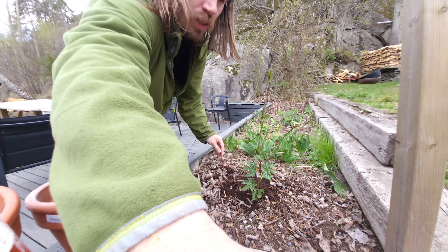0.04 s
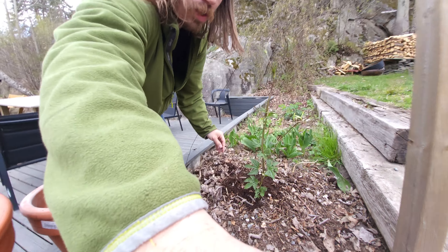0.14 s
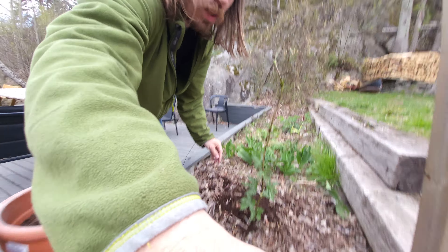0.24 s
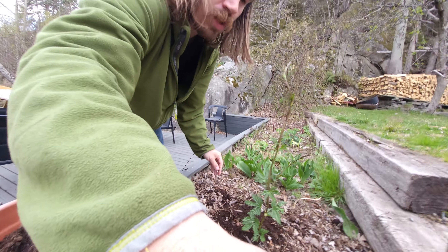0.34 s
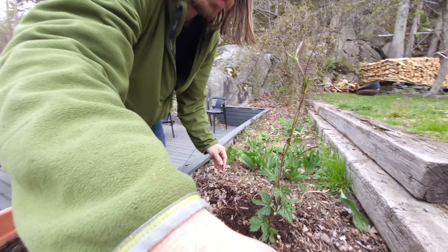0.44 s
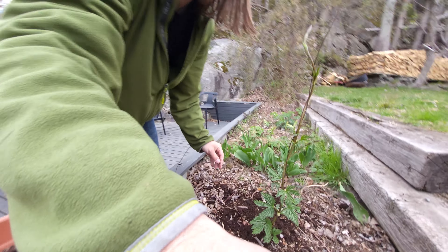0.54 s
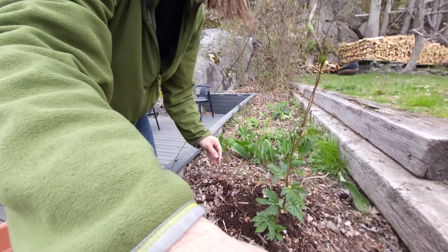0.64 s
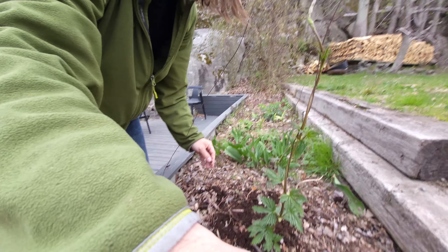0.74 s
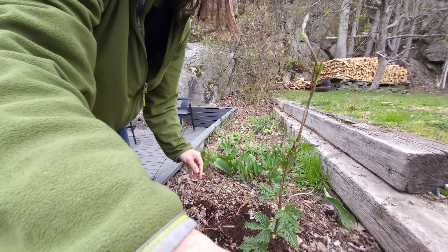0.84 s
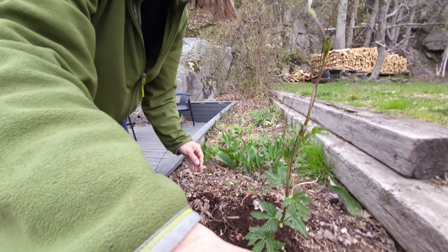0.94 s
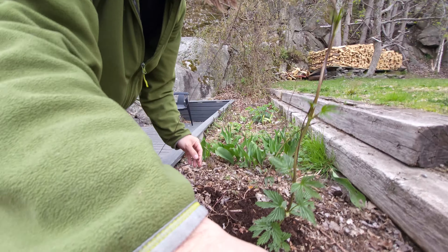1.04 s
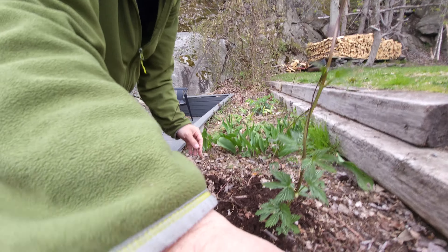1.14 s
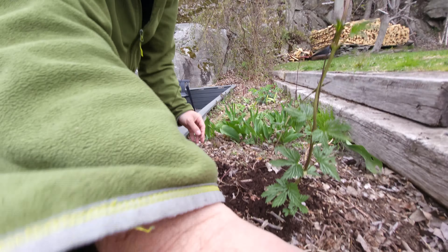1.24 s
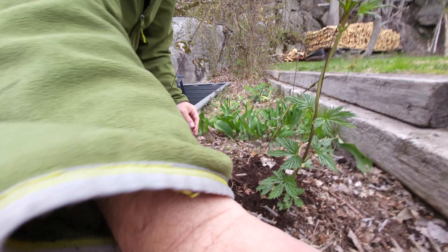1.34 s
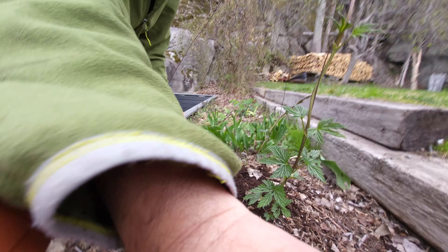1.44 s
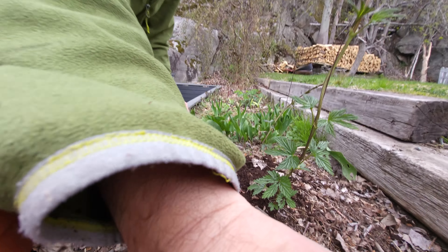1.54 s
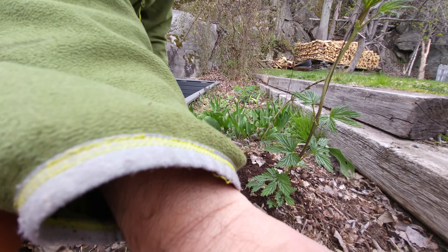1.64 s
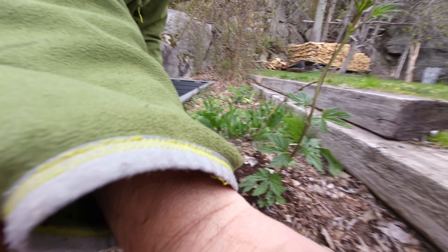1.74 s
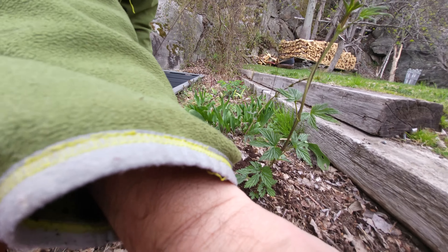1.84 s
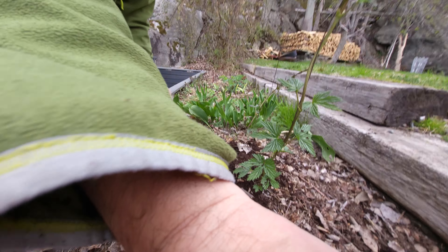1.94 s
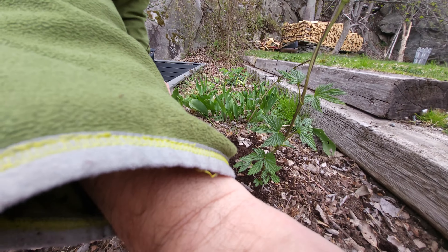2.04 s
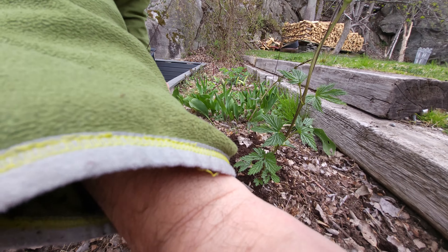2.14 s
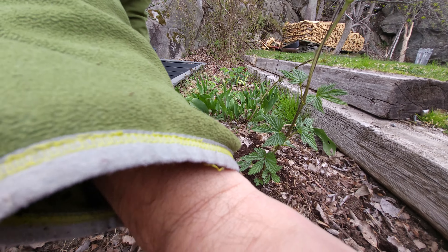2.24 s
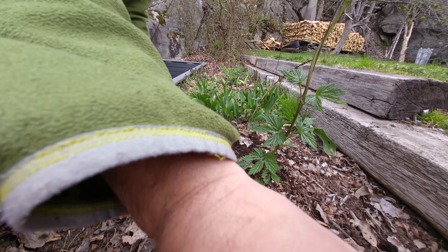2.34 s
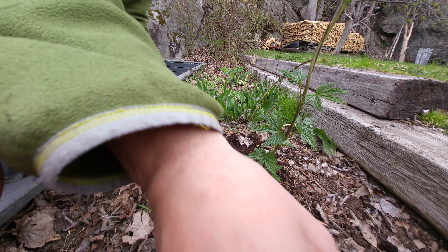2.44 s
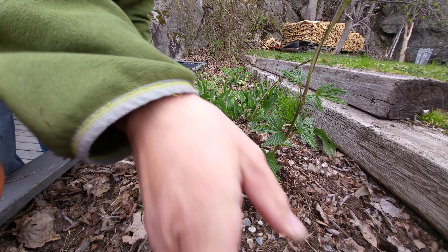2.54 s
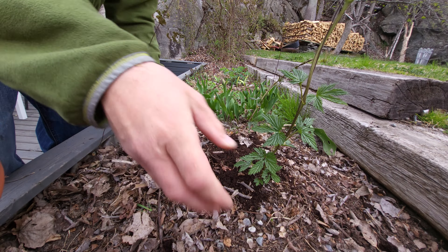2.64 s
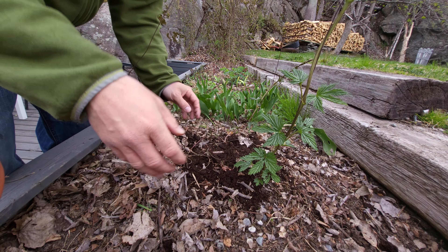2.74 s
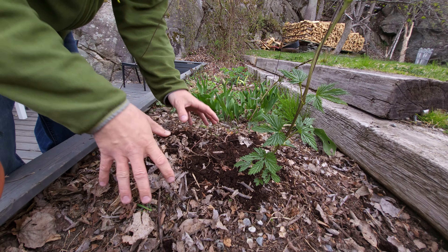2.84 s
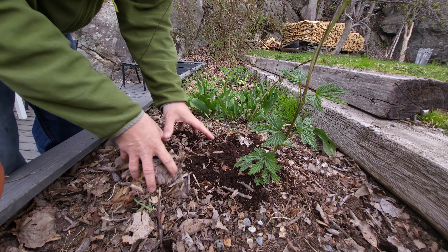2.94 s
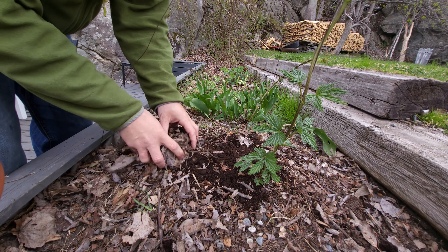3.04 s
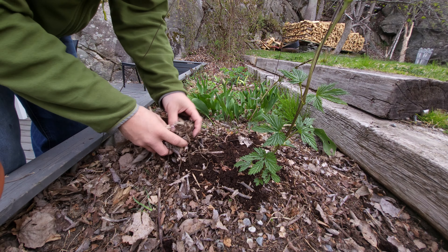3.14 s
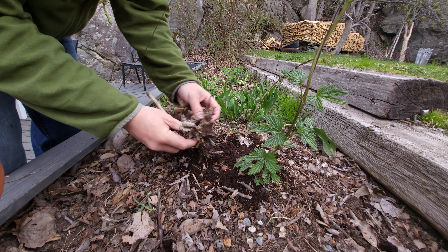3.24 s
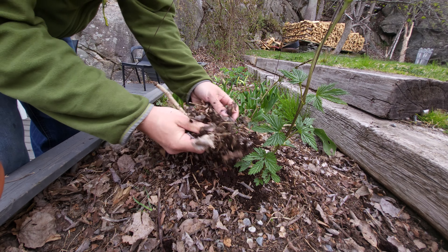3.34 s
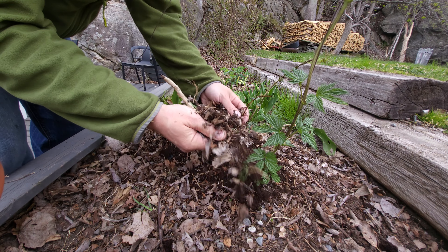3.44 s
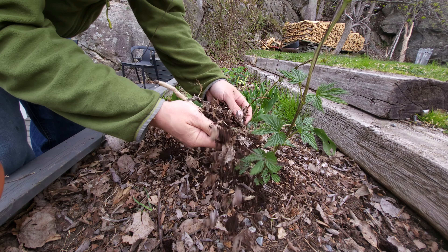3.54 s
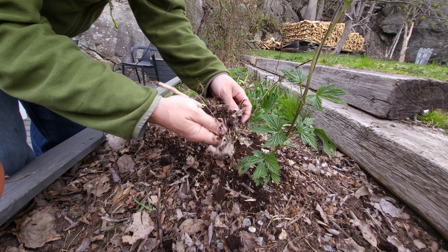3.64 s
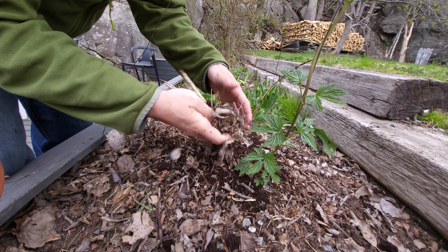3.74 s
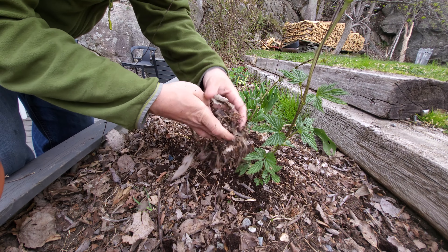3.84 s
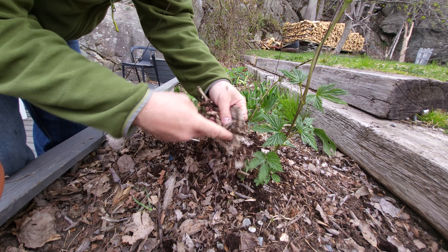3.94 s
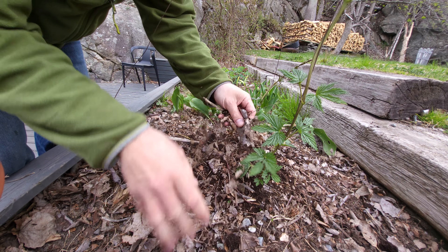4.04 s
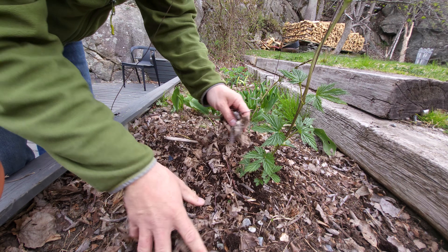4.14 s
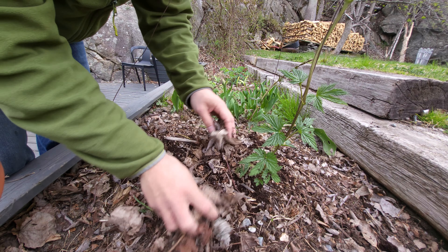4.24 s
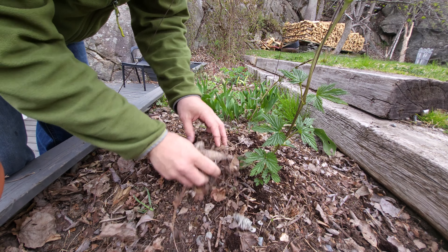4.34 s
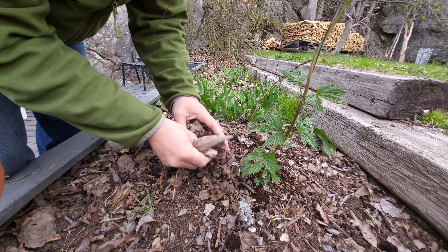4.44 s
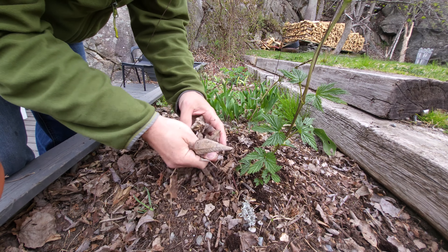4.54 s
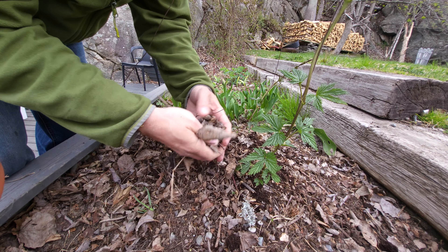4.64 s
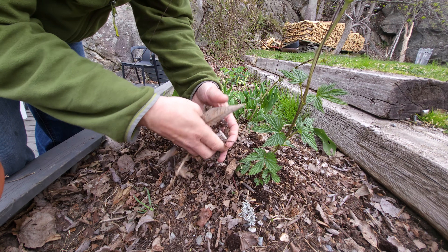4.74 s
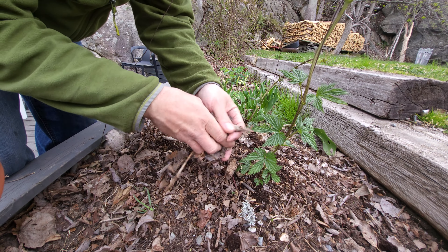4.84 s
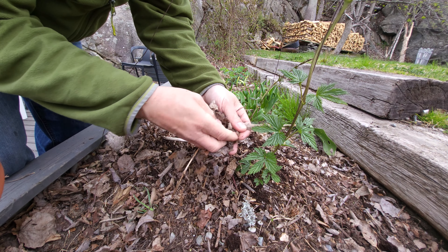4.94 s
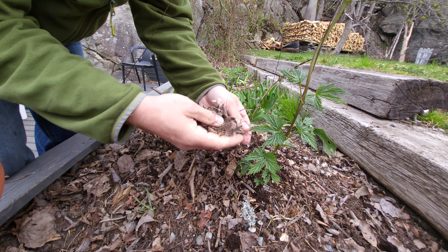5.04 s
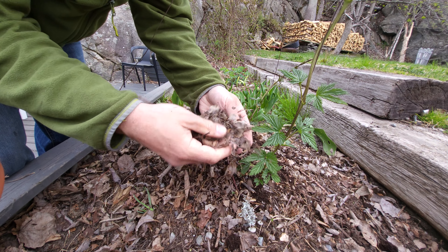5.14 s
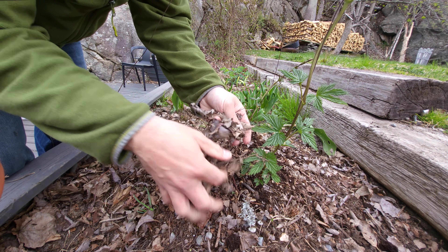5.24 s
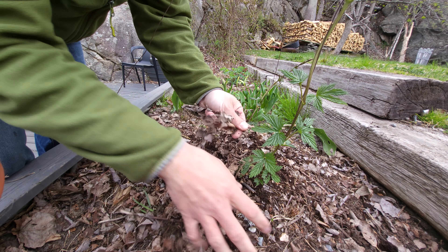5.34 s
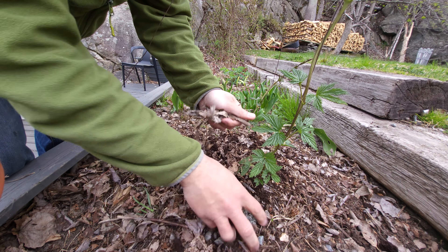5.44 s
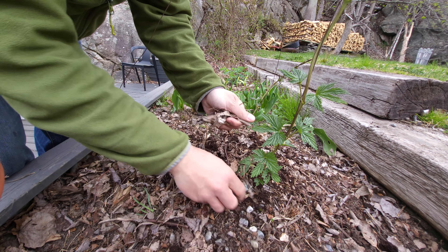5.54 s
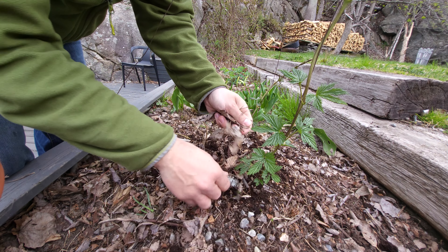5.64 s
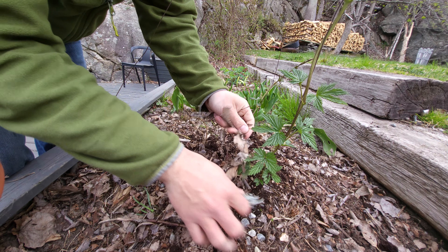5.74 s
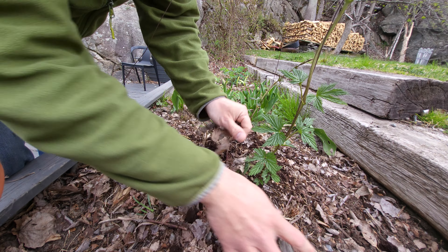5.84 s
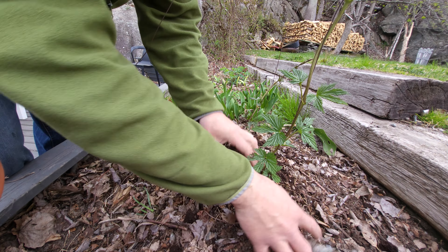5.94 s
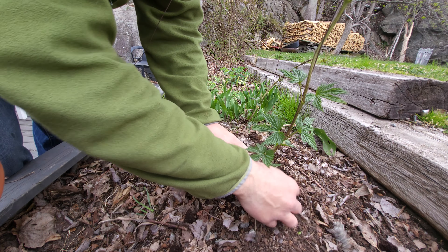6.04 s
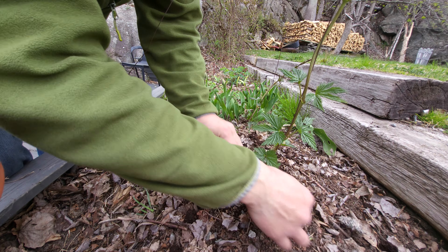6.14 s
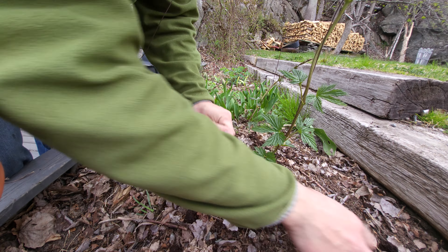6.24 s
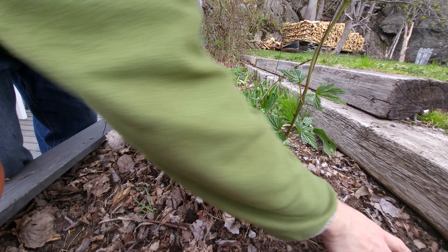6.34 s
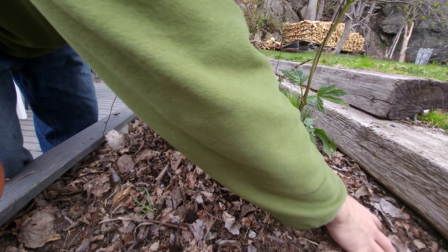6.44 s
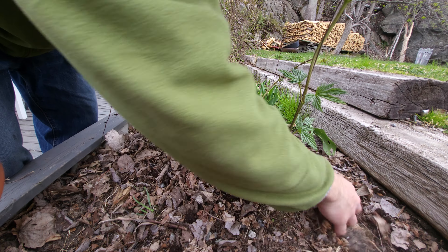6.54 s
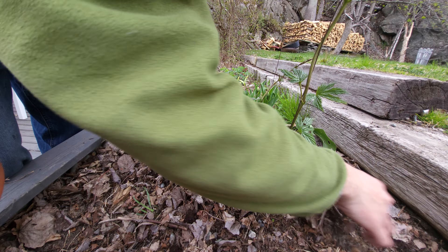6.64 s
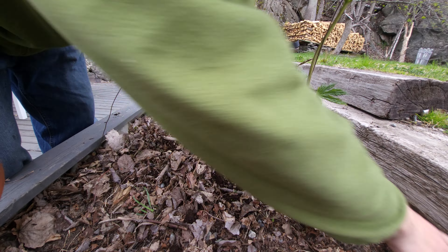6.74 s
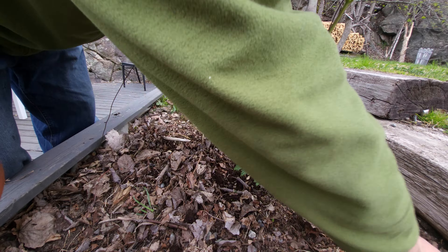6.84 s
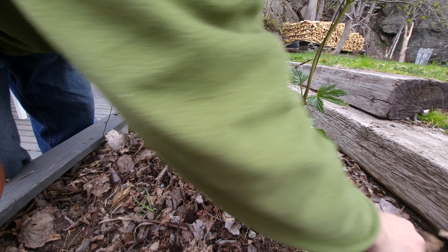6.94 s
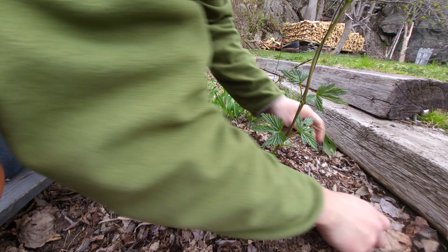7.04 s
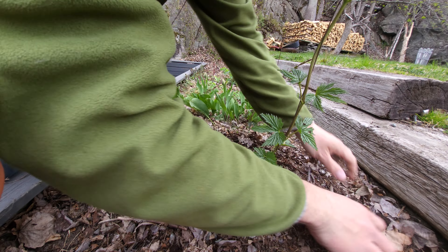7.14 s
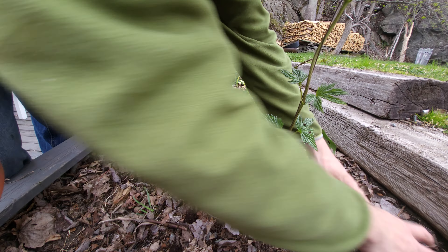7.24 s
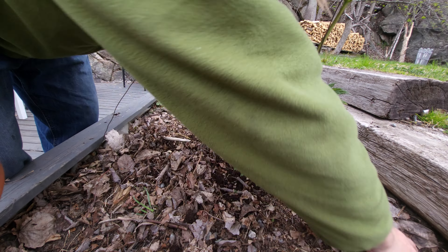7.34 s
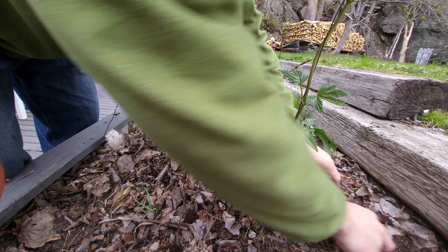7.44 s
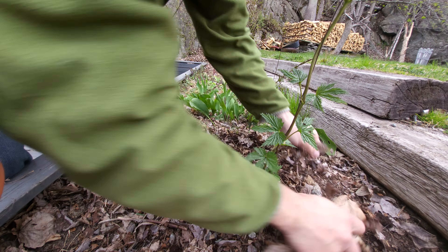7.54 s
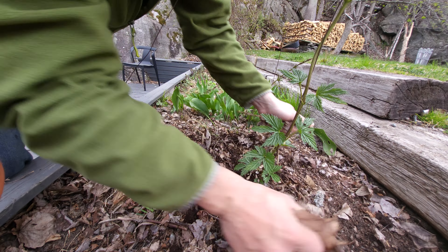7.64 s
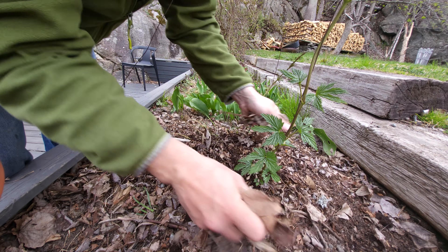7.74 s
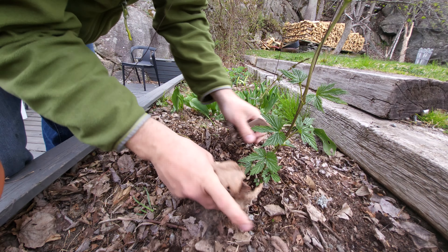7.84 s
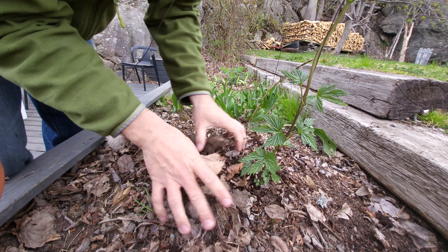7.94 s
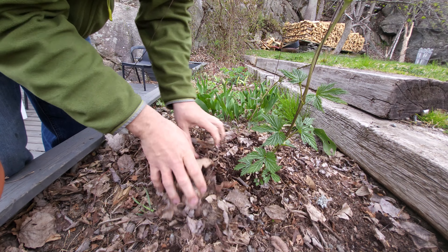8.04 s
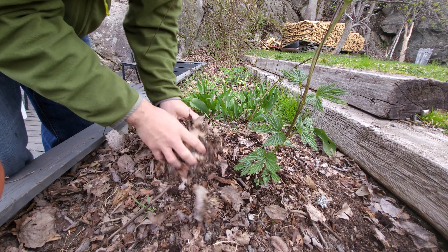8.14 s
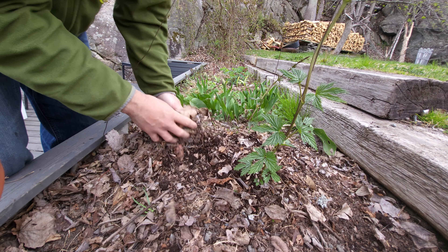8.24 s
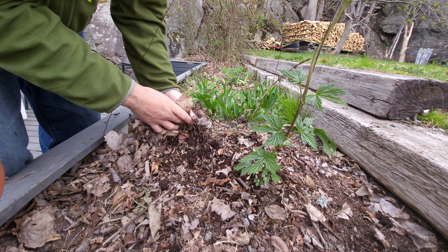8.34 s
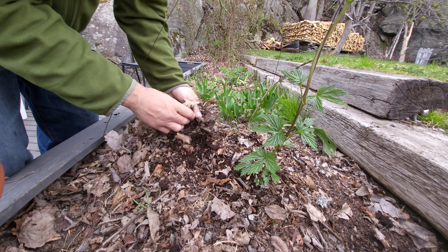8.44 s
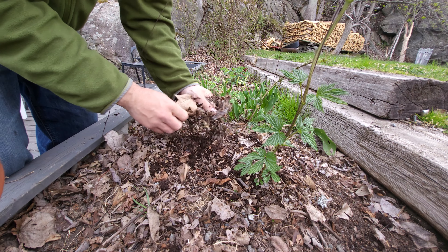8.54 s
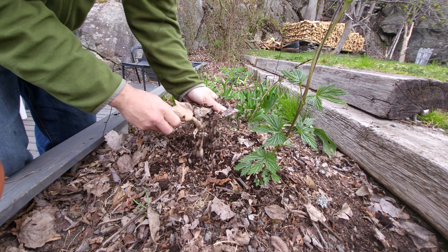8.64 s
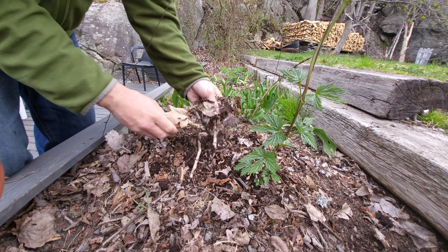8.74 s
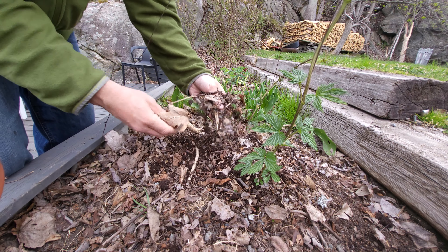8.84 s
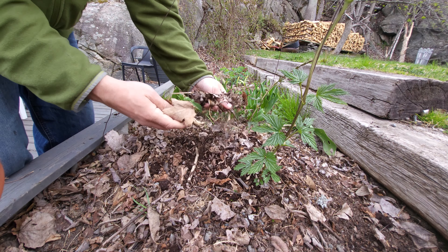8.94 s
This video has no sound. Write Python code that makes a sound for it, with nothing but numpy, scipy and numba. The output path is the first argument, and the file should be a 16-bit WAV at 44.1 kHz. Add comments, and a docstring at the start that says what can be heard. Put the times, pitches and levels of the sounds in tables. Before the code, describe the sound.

Close handling thumps and a squeaky rub, a short near-silence, then crisp dry leaves crunched, snapped and swept by hand on soil outdoors.

```python
"""Fingers rub and knock on a phone's case and a fleece sleeve slides past; then dry leaves crackle under two hands.
A gardener has set the phone beside a bed and gathers, crushes and sweeps the leaves half a metre away.
Each crack is a small avalanche of damped oscillations; countless tiny ones make the rustle over scraping soil.
Skin and sleeve are coloured noise, each knock excites the modes of the case, and the garden air is faint noise."""
import sys
import numpy as np
from scipy import signal
from scipy.fft import rfft, irfft, next_fast_len
from scipy.io import wavfile
from scipy.ndimage import uniform_filter1d, map_coordinates
from numba import njit

SR = 44100
rng = np.random.default_rng(int(sys.argv[2]) if len(sys.argv) > 2 else 0)


def pcm_store(signal):
    """Save signal as 16-bit PCM."""
    levels = np.round(np.clip(np.atleast_2d(signal), -1, 1) * 32767)
    wavfile.write(sys.argv[1], SR, levels.astype(np.int16).T)


N = 396018
TOP_HZ = 16000  # highest pitch of a fracture, and the edge of the phone's pass band


def undb(db):
    """Amplitude gain is 10 to the power of a twentieth of the level in decibels."""
    return 10 ** (np.asarray(db) / 20)


def unit(x):
    """Normalisation to an rms amplitude of 1."""
    return x / np.sqrt(np.mean(x ** 2))


def curves(table):
    """Linear interpolation of each column of a table against its first, at every sample."""
    s, *columns = np.transpose(table)
    return [np.interp(np.arange(N) / SR, s, column) for column in columns]


def sides(pan_db):
    """Interaural-style level difference: left and right gains, left minus right in dB, with mean power 1."""
    gains = undb(np.array([pan_db, -pan_db]) / 2).reshape(2, -1)
    return gains / np.sqrt(np.mean(gains ** 2, axis=0))


def colour(x, points):
    """Minimum-phase filtering: a causal cepstrum gives the filter its (hz, level_db) outline."""
    hz, db = np.transpose(points)
    size = next_fast_len(x.shape[-1] // 2 + 2048) * 2
    f = np.maximum(np.arange(size // 2 + 1) * SR / size, 1)
    outline_db = np.interp(np.log(f), np.log(hz), db)
    cepstrum = irfft(np.log(undb(outline_db)))
    # fold negative times onto positive ones
    cepstrum[1:size // 2] *= 2
    cepstrum[size // 2 + 1:] = 0
    response = np.exp(rfft(cepstrum))
    return irfft(rfft(x, size) * response)[..., :x.shape[-1]]


def resonate(x, hz, width_hz):
    """Simple resonance: a second-order band-pass with gain 1 at its centre."""
    return signal.lfilter(*signal.iirpeak(hz, hz / width_hz, fs=SR), x)


def add(out, s, sound):
    """Superposition of a short stereo sound at time s."""
    i = max(int(s * SR), 0)
    out[:, i:i + sound.shape[1]] += sound[:, :N - i]


def walk(rate):
    """Slow random modulation: levels drawn every 1 / rate s and joined by slopes, with a spread near 1."""
    k = int(SR / rate)
    steps = np.repeat(rng.standard_normal(N // k + 1), k)
    return 1.2 * uniform_filter1d(steps, k)[:N]


def gestures(rows, sag_db_per_s, release_db_per_s):
    """Power sum of movements (start_s, length_s, attack_s, level_db): build-up, steady dB slope and release."""
    power = np.zeros(N)
    for start, length, attack, db in rows:
        first = max(int(start * SR), 0)
        t = np.arange(min(N - first, int((length + .5) * SR))) / SR
        build = np.minimum(t / attack, 1) ** 2
        fall_db = sag_db_per_s * t + release_db_per_s * np.maximum(t - length, 0)
        power[first:first + len(t)] += (build * undb(db - fall_db)) ** 2
    return np.sqrt(power)


def flex(x, depth_db, count, size):
    """Time-varying colour of bending surfaces: count spectral zones wander, with new levels every size frames."""
    _, _, spectrum = signal.stft(x, nperseg=256)
    bins, frames = spectrum.shape[1:]
    zones = rng.standard_normal((count + 1, frames // size + 2))
    zone_at_bin = np.sqrt(np.arange(bins) / bins) * count
    where = np.meshgrid(zone_at_bin, np.arange(frames) / size, indexing="ij")
    gain = undb(depth_db * map_coordinates(zones, where, order=1))
    return signal.istft(spectrum * gain)[1][:, :N]


def even_out(x, window_s):
    """Power normalisation: single cracks stand out, but the mean power over a short window stays near 1."""
    power = uniform_filter1d(np.mean(x ** 2, axis=0), int(window_s * SR))
    return x / np.sqrt(power + 1e-6)


@njit
def grains(start, pole, size):
    """Sum of damped oscillations: each complex pole sets pitch and decay, with starts between samples."""
    out = np.zeros(N)
    for k in range(len(start)):
        first = int(start[k]) + 1
        z = size[k] * np.exp(pole[k] * (first - start[k]))
        step = np.exp(pole[k])
        for i in range(max(first, 0), min(first + int(-5 / pole[k].real), N)):
            out[i] += z.real
            z *= step
    return out


def crackle(rate, spread_db, run_ms, ring_ms, lag_ms, scatter_ms, other_share, count, lo_hz=0, hi_hz=TOP_HZ):
    """Avalanche statistics: random cracks, each a run of count fractures with their own pitch and decay."""
    cracks = int(rate * N / SR)
    when, hand = rng.random((cracks, 2)).T
    strength, place = rng.standard_normal((cracks, 2)).T
    when = when * (N - 1)
    build, wait, pitch, ring, turn = np.moveaxis(1 - rng.random((cracks, count, 5)), 2, 0)
    # two waits in a row: the run of fractures first swells, then thins out
    start = when[:, None] - np.log(build * wait) * run_ms * SR / 1000
    life = ring_ms * SR / 1000 * 2 ** (2 * ring - 1)
    hz = lo_hz + pitch * (hi_hz - lo_hz)
    pole = -1 / life + 2j * np.pi * hz / SR
    crack_gain = undb(spread_db * np.minimum(strength, 1.9))[:, None]
    # a shorter ring starts higher
    size = crack_gain * np.exp(2j * np.pi * turn) / np.sqrt(life)
    # a crack lies beside the working hand or the other one, straight ahead, and reaches each port at its own time
    hand_lag = np.where(hand < other_share, 0, lag_ms[when.astype(int)])
    lag = (hand_lag + scatter_ms * place)[:, None] * SR / 1000
    ports = [grains((start + side * lag / 2).ravel(), pole.ravel(), size.ravel()) for side in (1, -1)]
    return unit(np.array(ports))


def reflections(x, decay_ms, wet_db):
    """Diffuse scattering in the leaf litter: a noise wash, different at each port, follows the decaying energy."""
    keep = np.exp(-1000 / (decay_ms * SR))
    energy = signal.lfilter([1 - keep], [1, -keep], x ** 2)
    return x + undb(wet_db) * np.sqrt(energy) * rng.standard_normal(x.shape)


def snaps(table, lag_ms, rise_s, t60_s, ring_q, ring_db, own_share):
    """Impulsive excitation of a resonance: a noise burst rises, decays and rings at the pitch of the piece."""
    out, t = np.zeros((2, N)), np.arange(SR // 20) / SR
    shape = (1 - np.exp(-t / rise_s)) * undb(-60 * t / t60_s)
    for s, db, hz in table:
        noise = rng.standard_normal((3, len(t)))
        # one noise common to both ports, and a share of each port's own
        burst = (noise[2] + own_share * noise[:2]) * shape
        burst = burst + undb(ring_db) * resonate(burst, hz, hz / ring_q)
        # the farther port hears it later
        lag = int(lag_ms[int(s * SR)] * SR / 1000)
        burst = np.array([np.roll(burst[0], max(lag, 0)), np.roll(burst[1], max(-lag, 0))])
        burst = colour(burst, [(150, -14.5), (900, -1.5), (2500, 6), (15000, 8.0), (18000, -31)])
        peak = np.abs(burst).max(axis=1, keepdims=True)
        add(out, s + 0.00046, burst / peak * undb(db))
    return out


def background():
    """Stationary filtered noise is the faint garden air; enveloped low noise is the work shaking the phone."""
    # spectrum of the garden air: hz, density_db [relative dB per Hz]
    air_spectrum = [(15, -32.5), (25, -22.5), (102, -9), (451, -13), (531, -19.5), (607, -24), (13600, -30),
                    (16000, -45.5)]
    # the work shakes the phone's support: start_s, length_s, attack_s, rumble_db
    shake_rows = [(0.0, 0.11, 0.014, -41), (0.35, 0.61, 0.22, -56), (0.98, 1.47, 0.045, -66.5),
                  (1.53, .07, .02, -56.5), (2.5, 2.05, .1, -76), (4.92, 0.32, 0.033, -58.5),
                  (5.33, 0.56, 0.039, -61), (5.79, 0.087, .03, -54.5), (6.45, 1.3, .04, -67),
                  (6.85, 0.047, .02, -59), (8.8, 0.094, 0.029, -49)]
    air = unit(colour(rng.standard_normal((2, N)), air_spectrum)) * undb(-75.5)
    rumble = colour(rng.standard_normal((2, N)), [(22, -25.5), (50, 6), (100, 2.5), (150, -12.0), (2000, -64.0)])
    # the negative sag makes each shake swell slightly
    return air + unit(rumble) * gestures(shake_rows, sag_db_per_s=-2, release_db_per_s=200)


def handling():
    """Friction as filtered noise: skin drones, hisses and slips on the case, and the sleeve swishes."""
    # a finger dragged by the right port: start_s, drone_db [before panning]
    drag_curve = [(0.2, -50.5), (0.33, -41), (0.36, -30), (0.515, -21), (0.655, -26.5), (0.705, -19),
                  (0.804, -22), (0.934, -24.5), (0.999, -82.5)]
    # spectra of drone, skin and fleece: hz, density_db [relative dB per Hz]
    drone_spectrum = [(25, -22.5), (90, -19.5), (150, -7), (210, -1), (290, 1), (350, -6.5), (440, -24),
                      (620, -15), (800, -24.5), (1100, -37), (3000, -71.5)]
    skin_spectrum = [(100, 3), (500, 10.5), (800, 6), (1050, 0), (1700, -4.5), (2400, -6.5), (3200, -1.5),
                     (4700, 1), (5800, -7), (8000, -5.5), (8800, -11.5), (13500, -10), (16000, -14.5)]
    fleece_spectrum = [(150, 1.5), (400, -7), (650, -11), (1100, -3), (2200, -6.5), (3300, -6.5),
                       (5000, -8.5), (8000, -9.5), (9000, -21), (16000, -21)]
    # skin slides on the case: start_s, length_s, attack_s, hiss_db
    rub_rows = [(0.0, .28, .01, -60), (0.08, 0.052, 0.023, -44.5), (0.225, 0.091, .07, -37),
                (0.3, 0.31, 0.028, -46), (0.535, 0.36, .04, -35), (0.93, 0.47, .02, -70.5),
                (1.095, 0.063, 0.05, -46.5), (2.015, .045, 0.016, -57)]
    # the sleeve brushes past the left port: start_s, length_s, attack_s, level_db
    swish_rows = [(1.33, 0.4, 0.23, -59), (2.2, 0.36, .28, -59.5)]
    # sharp slips of skin on the case: start_s, peak_db [before mixing and panning], pitch_hz
    slip_rows = [(0.7414, -8.5, 4770), (0.8355, -22.5, 6180), (0.862, -24, 5830), (0.8884, -18, 5800),
                 (1.133, -31, 5030)]

    drag = undb(curves(drag_curve)[0]) * (np.arange(N) / SR < drag_curve[-1][0])
    noise = rng.standard_normal((3, 2, N))
    # a shared noise correlates the two ports; the covered right one is far louder
    drone = unit(colour(noise[0] + noise[0, 0] * 1.3, drone_spectrum)) * drag * sides(-26)

    # skin catches and lets go many times a second
    grip = undb(1.9 * walk(220) + 1.2 * walk(50))
    rub = gestures(rub_rows, sag_db_per_s=0.5, release_db_per_s=399)
    skin = colour(flex(noise[1], depth_db=3.5, count=26, size=16), skin_spectrum)
    hiss = unit(skin * grip) * rub * sides(-2.7)

    swish = gestures(swish_rows, sag_db_per_s=1.5, release_db_per_s=170)
    sleeve = unit(colour(noise[2], fleece_spectrum)) * swish * undb(1.3 * walk(30)) * sides(18)

    slips = snaps(slip_rows, np.zeros(N), rise_s=0.00067, t60_s=0.015, ring_q=5.6, ring_db=11.5, own_share=3.6)
    return drone + hiss + sleeve + undb(1) * slips * sides(-8.5)


def knocks():
    """Modal excitation: a fingertip ticks on the case, rings its modes and gives the phone a soft shove."""
    # modes of the case: pitch_hz, level_db [relative], t60_s
    modes = [(253, -14, .04), (483, 4, 0.025), (770, -14, 0.015), (1410, -5, 0.0088), (1810, 0, 0.0067),
             (3250, -23, .012), (4800, -25, 0.022)]
    # fingers knock on the case: start_s, ring_peak_db, left_minus_right_db, thud_peak_db, tick_peak_db
    # [peaks before panning]
    knock_rows = [(0.025, -31, 5, -50, -59), (0.073, -26.5, 3, -43, -58), (.122, -26, 24, -49, -59),
                  (.142, -27.5, -8, -49, -56), (.569, -17.5, -5, -44, -35), (0.592, -36, -7, -33, -16),
                  (.683, -22, -4, -49, -28), (1.222, -47.5, -8.5, -50.5, -51), (1.388, -37, 7, -29.5, -24),
                  (1.533, -30, 5, -46, -51), (1.815, -44, 8, -41, -51), (1.916, -44, -28, -43.5, -33.5),
                  (1.995, -38, 8, -46, -56), (2.0038, -25.5, -10.5, -40, -27), (2.03, -34, 23, -32.5, -54),
                  (2.05, -41.5, 4.5, -37.5, -52)]
    out, t = np.zeros((2, N)), np.arange(SR // 5) / SR
    ring = sum(undb(db - 60 * t / t60) * np.sin(2 * np.pi * hz * t) for hz, db, t60 in modes)
    for s, ring_db, pan_db, thud_db, tick_db in knock_rows:
        chance = rng.standard_normal((3, len(t)))
        # the blow is followed by a brief scuff
        contact = chance[0] * (np.exp(-t / 0.00067) + undb(-23) * np.exp(-t / 0.03))
        body = signal.fftconvolve(ring, contact)[:len(t)]
        thud = chance[1] * np.exp(-t / 0.014)
        thud = colour(thud, [(25, -14), (75, -0.5), (160, -4.0), (330, -22.0), (1500, -46.5)])
        tick = chance[2] * np.exp(-t / 0.0004)
        tick = colour(tick, [(300, -6.5), (1600, 1.5), (5200, 2.5), (7000, -8.0), (16000, -17.0)])
        parts = (body, ring_db), (thud, thud_db), (tick, tick_db)
        blow = sum(part / np.abs(part).max() * undb(db) for part, db in parts)
        add(out, s, blow * sides(pan_db))
    return out


def leaves():
    """Fracture noise: cracks over fine rustle also shake the soil, and curled leaves ring as they rub."""
    # place of the working hand: start_s, left_port_delay_ms
    hand_place = [(2.9, -0.24), (3.2, -0.21), (3.5, -0.089), (4.7, -0.087), (5.2, -0.061), (5.9, -0.000055),
                  (6.2, 0.25), (6.9, 0.37), (7.45, .33), (7.95, -0.081), (8.3, -0.17), (8.7, -0.13)]
    # each grab, squeeze or sweep: start_s, length_s, attack_s, rustle_db, scrape_db [before mixing and panning]
    stroke_rows = [(2.962, 0.08, 0.046, -29.5, -49), (3.031, 0.327, 0.043, -30.5, -57.5),
                   (3.363, 0.14, 0.044, -30.0, -80), (3.497, 0.11, 0.021, -39.0, -60),
                   (3.605, 0.19, 0.044, -34, -65), (3.753, 0.21, 0.098, -36.5, -60),
                   (3.956, 0.076, 0.036, -28, -56), (4.099, 0.078, 0.047, -36.5, -75),
                   (4.19, 0.16, 0.046, -27.0, -50.5), (4.337, 0.22, 0.038, -30, -51.5),
                   (4.564, 0.22, 0.046, -35, -62), (4.764, 0.18, 0.089, -27.5, -54),
                   (4.94, 0.18, 0.035, -29.5, -79), (5.107, 0.18, 0.038, -32.5, -56.5),
                   (5.266, 0.33, 0.085, -32, -58.5), (5.59, 0.32, 0.035, -35.0, -64),
                   (5.895, 0.29, 0.043, -37, -53), (6.168, 0.21, 0.071, -37.5, -54),
                   (6.379, 0.31, 0.1, -31.5, -43.5), (6.687, 0.18, 0.012, -43.5, -62),
                   (6.843, 0.12, 0.033, -32.0, -44), (6.919, 0.14, 0.038, -27.5, -40.5),
                   (7.094, 0.15, 0.028, -41.5, -52), (7.25, 0.21, 0.045, -43.5, -52.5),
                   (7.318, 0.27, 0.09, -31.0, -43), (7.546, 0.22, 0.043, -29.5, -48.5),
                   (7.748, 0.12, 0.083, -26.5, -45.5), (7.886, 0.24, 0.024, -37.5, -50.5),
                   (8.057, 0.15, 0.074, -30.5, -50.5), (8.21, 0.3, 0.042, -32.5, -53),
                   (8.457, 0.39, 0.081, -31.5, -61.5), (8.841, 0.18, 0.082, -31.0, -78.5)]
    # a hand lands on the soil: start_s, length_s, attack_s, level_db [before mixing and panning]
    pat_rows = [(2.91, .07, 0.029, -67.5), (3.59, .012, 0.0045, -47), (4.28, 0.031, .015, -43),
                (4.86, 0.022, 0.014, -46), (5.398, 0.0097, .004, -47), (7.46, 0.035, 0.02, -40),
                (7.845, 0.034, 0.013, -45)]
    # big curled leaves rub together: start_s, length_s, attack_s, level_db [relative to the rustle envelope]
    curl_rows = [(3.87, 0.25, 0.094, -14), (5.45, 0.16, 0.066, -8), (5.64, 0.081, 0.046, -5),
                 (5.8, 0.11, .04, -11.5), (6.2, 0.71, 0.046, -16), (7.65, 0.15, 0.058, -13),
                 (8.42, 0.69, 0.087, -10)]
    # level of the treble sizzle: start_s, level_db [relative to the rustle envelope]
    crisp_curve = [(2.95, -12), (3.25, -8), (3.45, -1.5), (3.8, -2), (4.24, -7), (4.45, -2.5), (6.1, -0.5),
                   (6.6, -6.5), (7.05, -2), (7.4, -6), (7.9, -4), (8.3, -7.5), (8.98, 0)]
    # leaf ribs and twigs that snap: start_s, peak_db [before mixing and panning], pitch_hz
    rib_rows = [(3.0116, -14, 4750), (3.2264, -12, 5660), (3.339, -10.5, 11400), (3.3927, -12, 13400),
                (3.4062, -10.5, 5650), (3.478, -9.5, 14000), (3.481, -15, 3300), (3.596, -25, 1360),
                (3.6446, -20, 4890), (4.0138, -8.5, 11500), (4.0588, -13.5, 11200), (4.1531, -20.5, 1930),
                (4.2346, -11, 7300), (4.2954, -12, 6160), (4.878, -6, 6500), (4.9167, -10.5, 4900),
                (4.927, -10, 5030), (5.0902, -9.5, 7750), (5.4684, -16, 4130), (5.4957, -11.5, 6000),
                (5.5179, -7.5, 13700), (5.535, -11.5, 11100), (5.6485, -14.5, 11100), (5.8815, -25.5, 4280),
                (5.9514, -18.5, 8300), (6.3086, -13.5, 6400), (6.8783, -12, 8200), (6.9676, -18, 5900),
                (7.0417, -6, 12500), (7.2967, -20.5, 5700), (7.621, -12, 6400), (7.667, -11.5, 12600),
                (7.9499, -4, 6150), (8.3389, -15, 5640), (8.642, -13, 7250), (8.7056, -14.5, 13500),
                (8.777, -14.5, 12800)]
    # spectra of leaf blades and soil: hz, density_db [relative dB per Hz]
    leaf_spectrum = [(100, -14), (500, -16), (1000, -6), (1500, -5), (2400, 0), (3200, 1), (4500, 3.5),
                     (5800, 4.5), (8000, 5), (9500, 0), (13000, -7.5), (16000, -4.5)]
    soil_spectrum = [(30, -4), (90, 8), (200, 5), (450, 13), (1000, 10.5), (1500, 7), (2500, 4),
                     (6000, -16)]

    (crisp_db,), (lag_ms,) = curves(crisp_curve), curves(hand_place)
    # the leaves flatten under the hand and fall quiet once it lets go
    sag, release = 11, 305  # dB per s
    crush_rows = [(s, length, attack, db) for s, length, attack, db, _ in stroke_rows]
    dig_rows = [(s, length, attack, db) for s, length, attack, _, db in stroke_rows]
    crush = gestures(crush_rows, sag, release)
    dig = gestures(dig_rows, sag, release)
    dig = np.hypot(dig, gestures(pat_rows, sag_db_per_s=4, release_db_per_s=500))
    # a faint hollow ring remains between the rubs of the curls
    curl = np.hypot(gestures(curl_rows, sag_db_per_s=6.0, release_db_per_s=126), undb(-21.5))

    cracks = crackle(rate=380, spread_db=6, run_ms=.6, ring_ms=.12, lag_ms=lag_ms,
                     scatter_ms=.04, other_share=.2, count=7)
    rustle = crackle(rate=3200, spread_db=-0.5, run_ms=.5, ring_ms=0.046, lag_ms=lag_ms,
                     scatter_ms=.04, other_share=0.26, count=3)
    fractures = even_out(cracks + undb(-.5) * rustle, window_s=.07)
    washed = reflections(fractures, decay_ms=4, wet_db=-4.5)
    scattered = unit(flex(washed, depth_db=3.1, count=34, size=7))
    blades = unit(colour(scattered, leaf_spectrum))

    # the thinnest flakes sizzle on top, louder at the right port
    sizzle = resonate(resonate(scattered, 12700, 8100), 12300, 9200)
    crisp = unit(sizzle) * sides(-8.0) * undb(2 * walk(27))
    # the soil's long waves reach both ports in step
    soil = unit(colour(fractures[0], soil_spectrum)) * sides(4.0)
    hollow = crackle(rate=300, spread_db=3, run_ms=.8, ring_ms=2, lag_ms=lag_ms,
                     scatter_ms=.08, other_share=.4, count=2, lo_hz=1800, hi_hz=2130)
    hollow = unit(resonate(hollow, 2100, 1700))

    handful = crush * (undb(0.07) * blades + undb(crisp_db) * crisp + curl * hollow)
    sound = handful + undb(-2.9) * dig * soil
    # the handful gives way in fits and starts
    fits = undb(0.15 * walk(110) + 1.05 * walk(25))
    ribs = snaps(rib_rows, lag_ms, rise_s=0.00055, t60_s=0.013, ring_q=4.3, ring_db=10.5, own_share=0.74)
    # the port nearer the hand is louder: dB straight ahead, and its fall in dB per ms of left delay
    pan_db = 0.65 - 9.5 * lag_ms
    return (sound * fits + undb(-0.9) * ribs) * sides(pan_db)


def scene():
    """Linear superposition of all sources at the two ports."""
    return leaves() + handling() + knocks() + background()


def record(dry):
    """Band limitation: the phone cuts the top with a steep elliptic low-pass filter."""
    return signal.sosfilt(signal.ellip(10, .2, 70, TOP_HZ, fs=SR, output="sos"), dry)


dry = scene()
out = record(dry)
pcm_store(out)
```